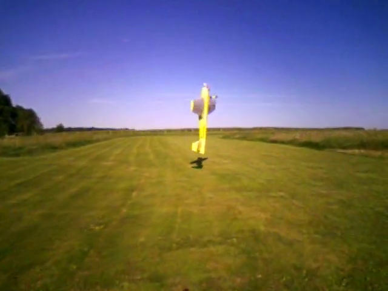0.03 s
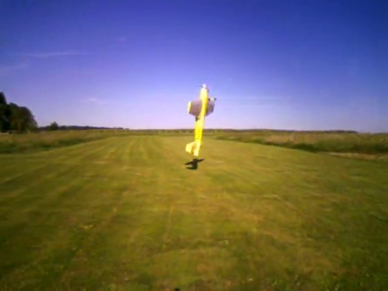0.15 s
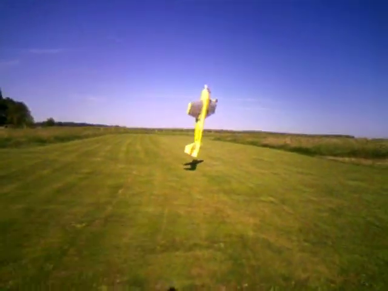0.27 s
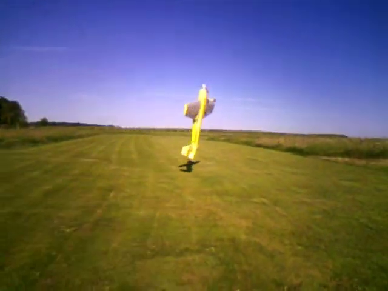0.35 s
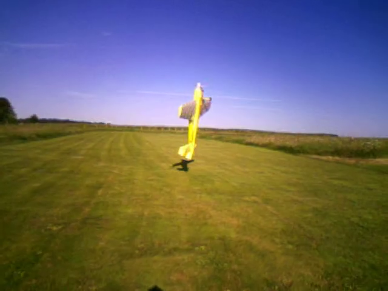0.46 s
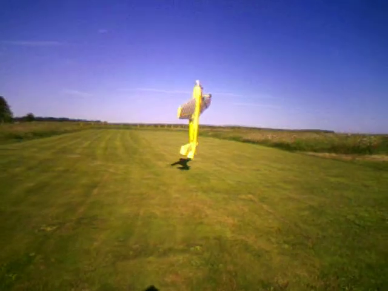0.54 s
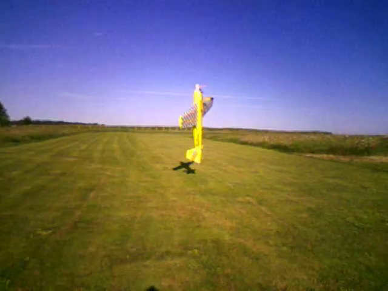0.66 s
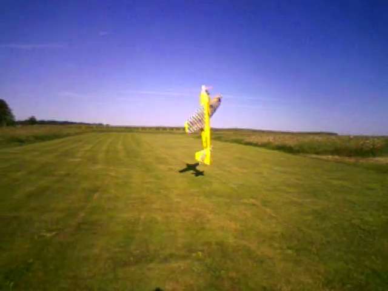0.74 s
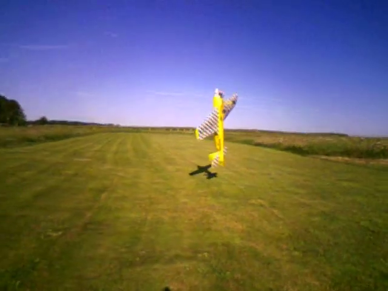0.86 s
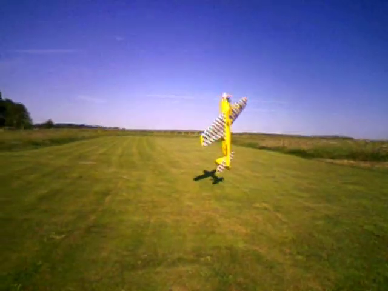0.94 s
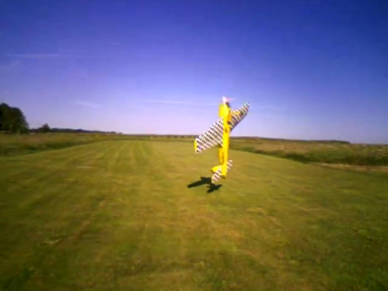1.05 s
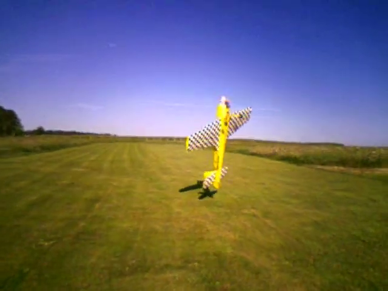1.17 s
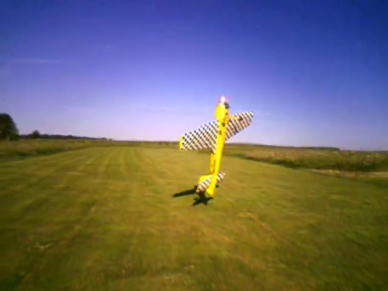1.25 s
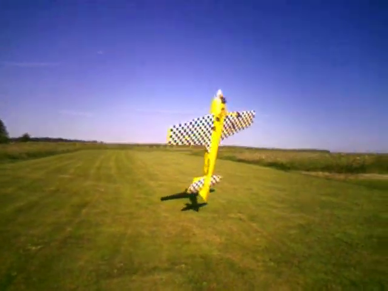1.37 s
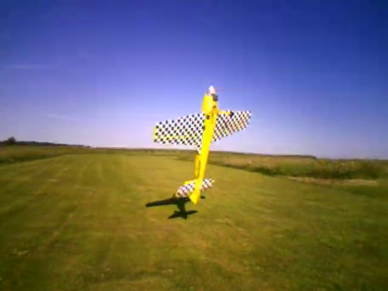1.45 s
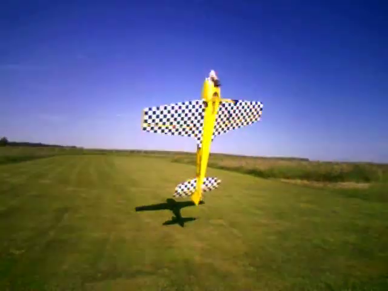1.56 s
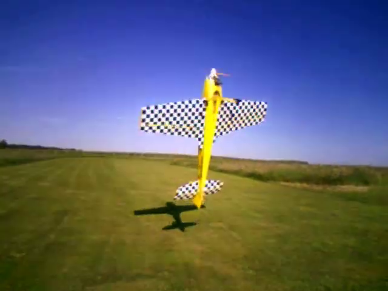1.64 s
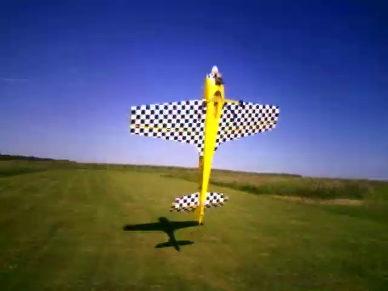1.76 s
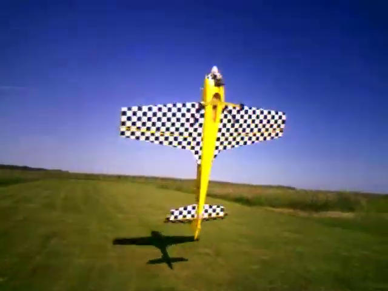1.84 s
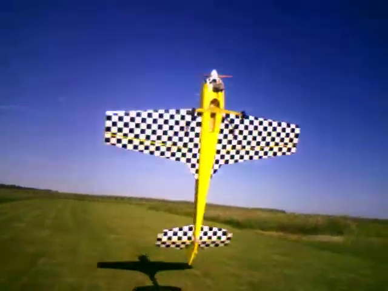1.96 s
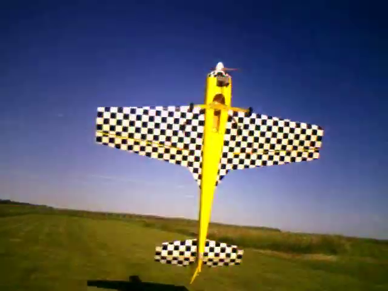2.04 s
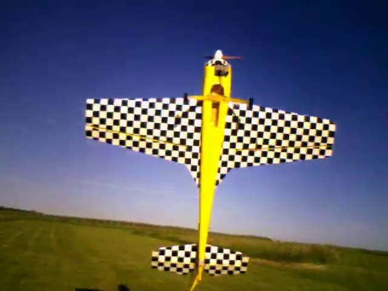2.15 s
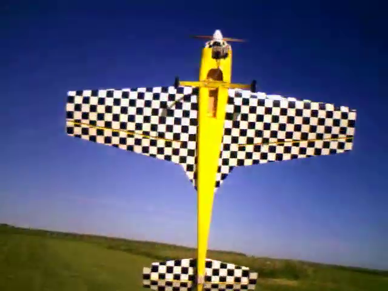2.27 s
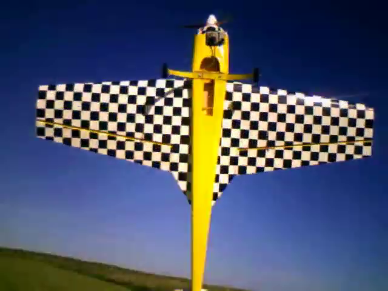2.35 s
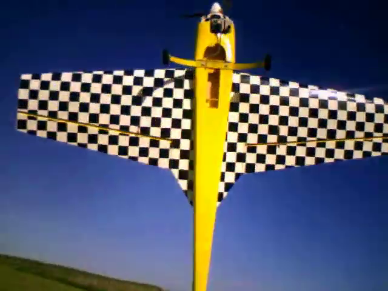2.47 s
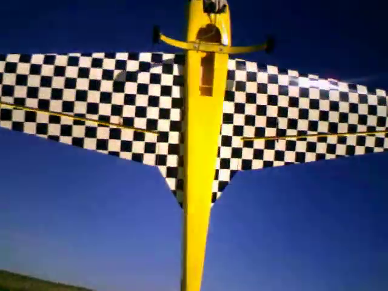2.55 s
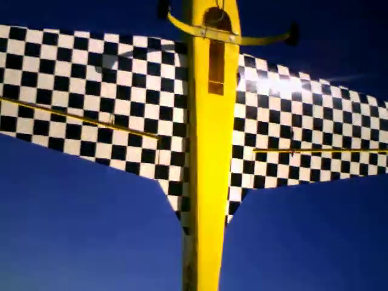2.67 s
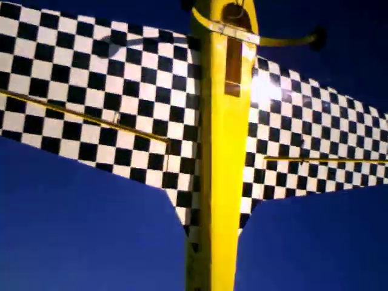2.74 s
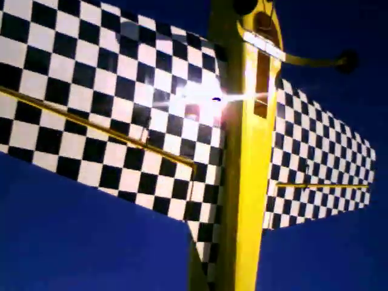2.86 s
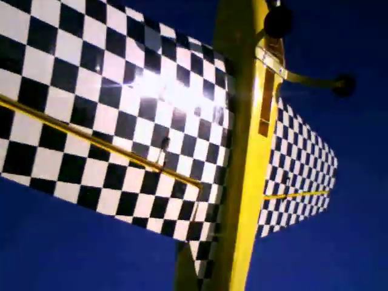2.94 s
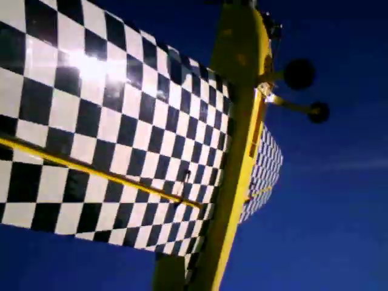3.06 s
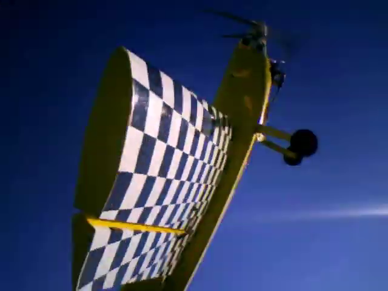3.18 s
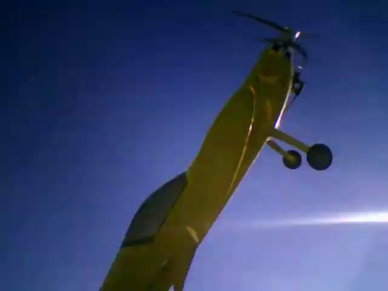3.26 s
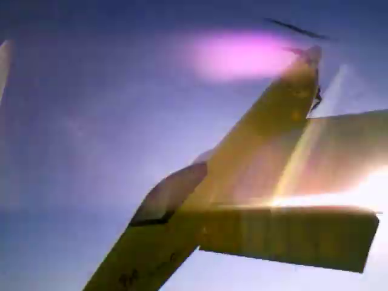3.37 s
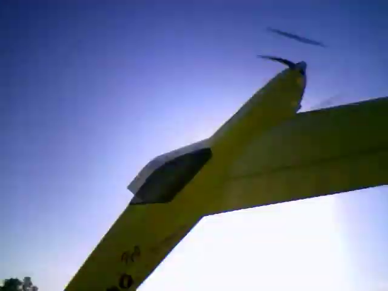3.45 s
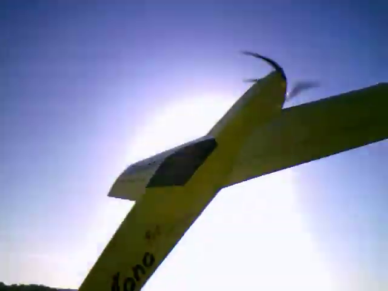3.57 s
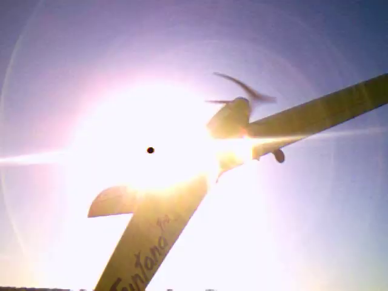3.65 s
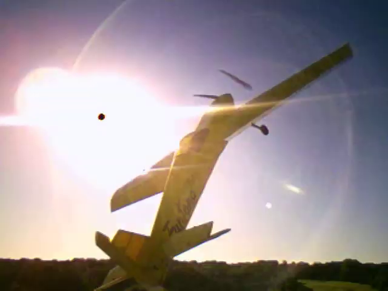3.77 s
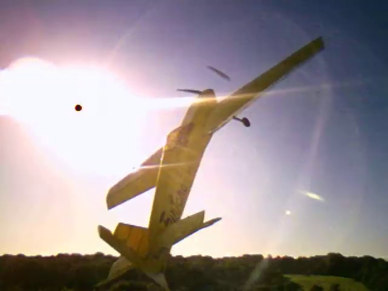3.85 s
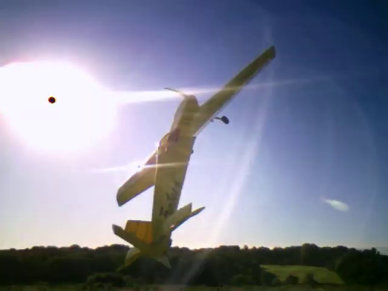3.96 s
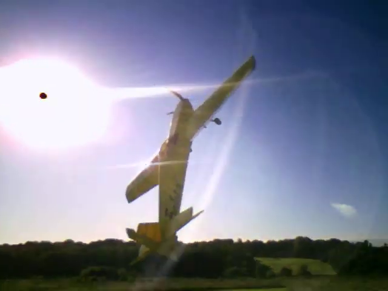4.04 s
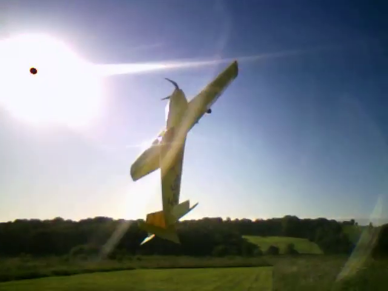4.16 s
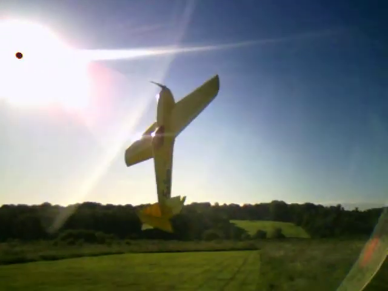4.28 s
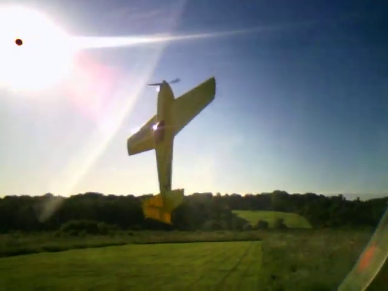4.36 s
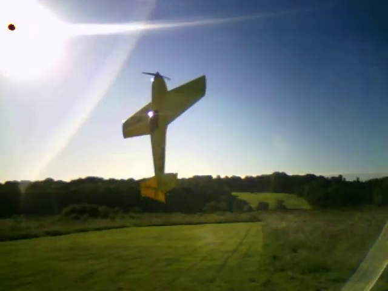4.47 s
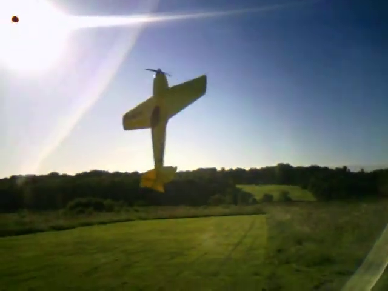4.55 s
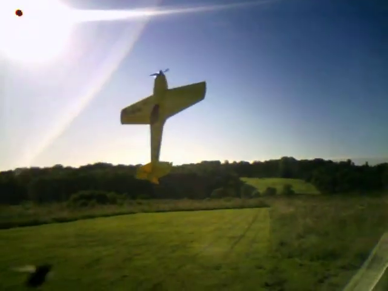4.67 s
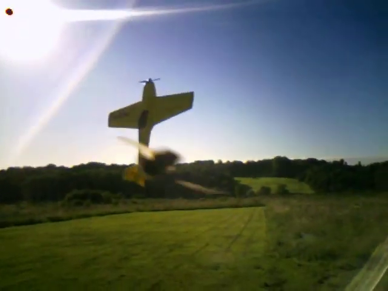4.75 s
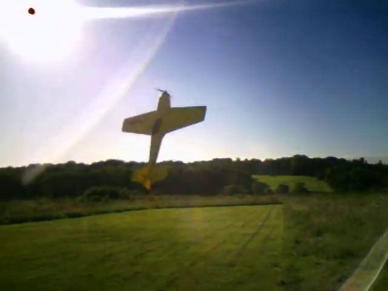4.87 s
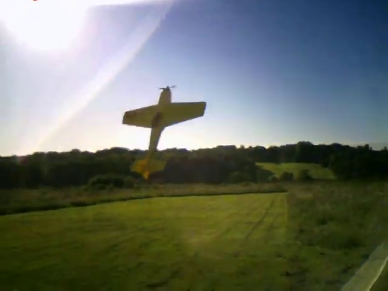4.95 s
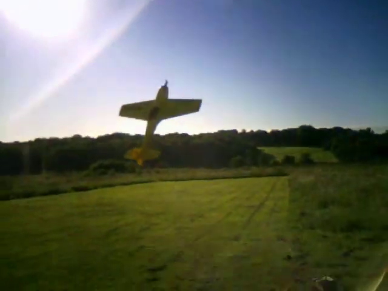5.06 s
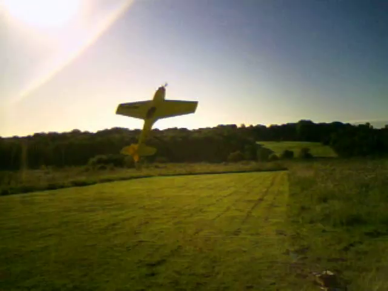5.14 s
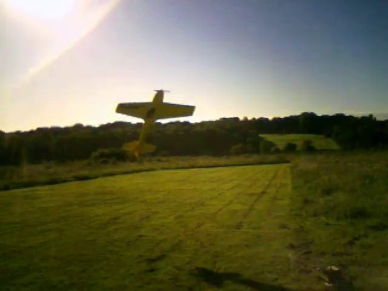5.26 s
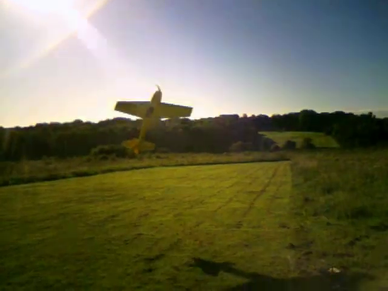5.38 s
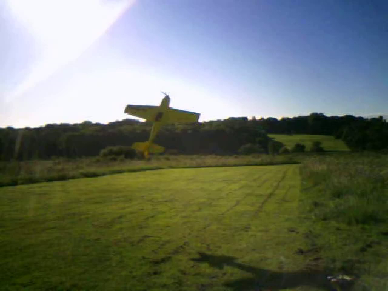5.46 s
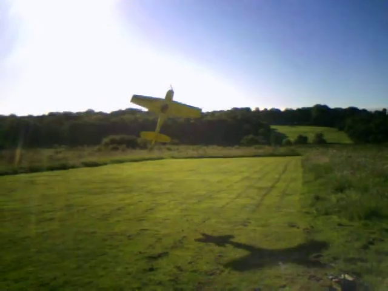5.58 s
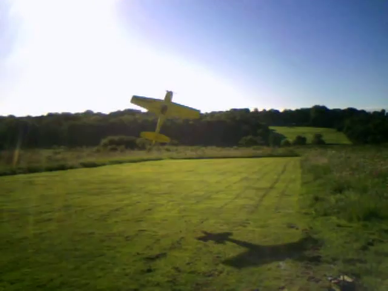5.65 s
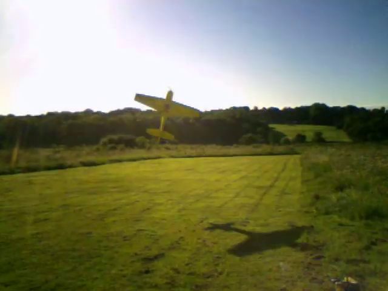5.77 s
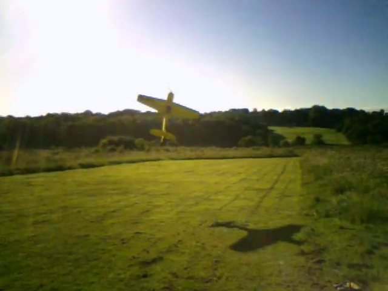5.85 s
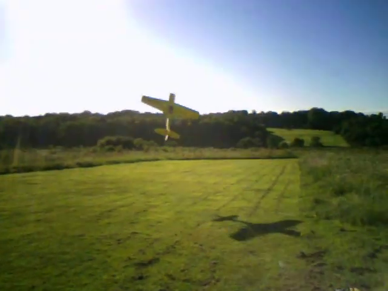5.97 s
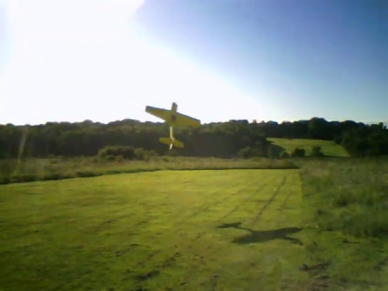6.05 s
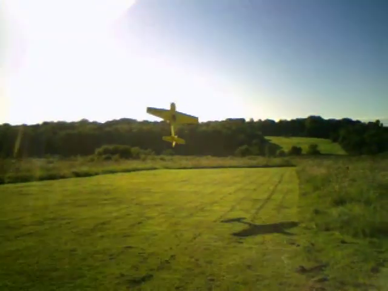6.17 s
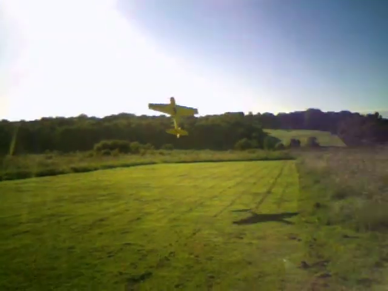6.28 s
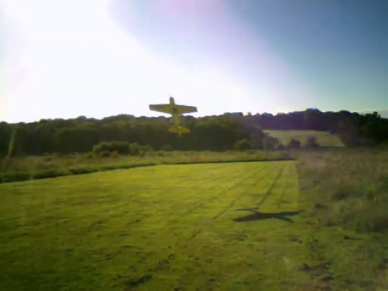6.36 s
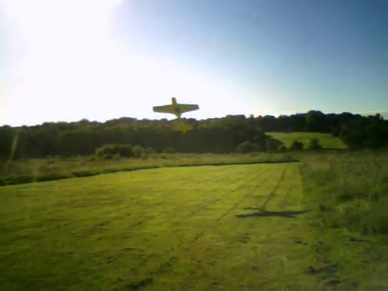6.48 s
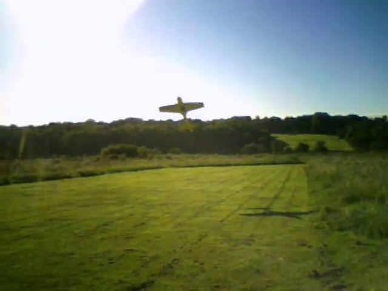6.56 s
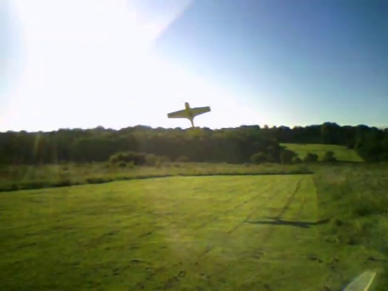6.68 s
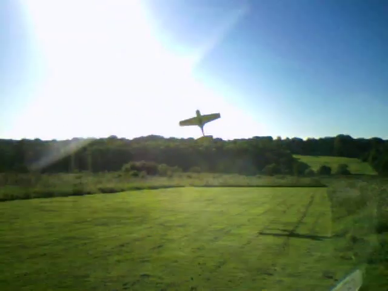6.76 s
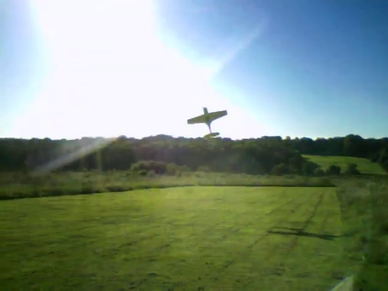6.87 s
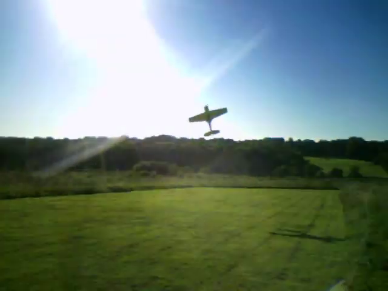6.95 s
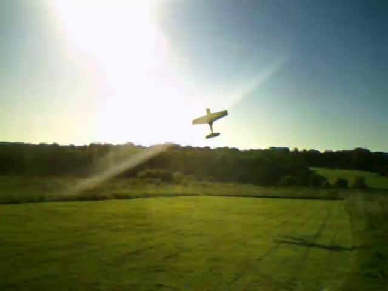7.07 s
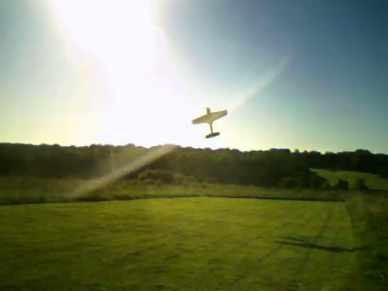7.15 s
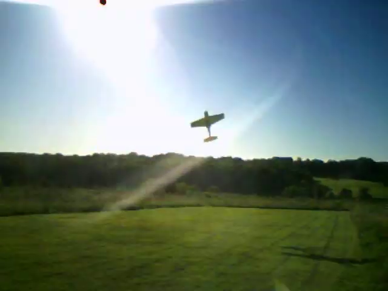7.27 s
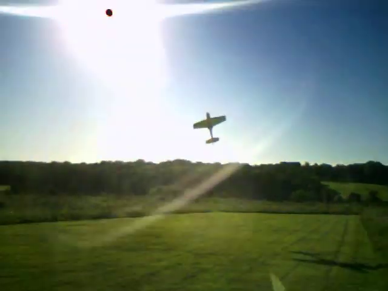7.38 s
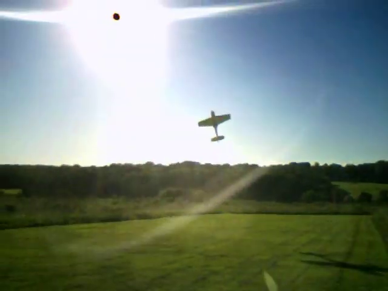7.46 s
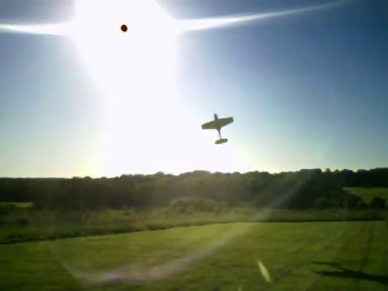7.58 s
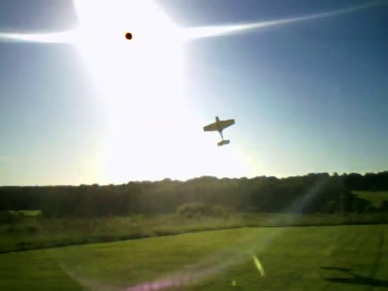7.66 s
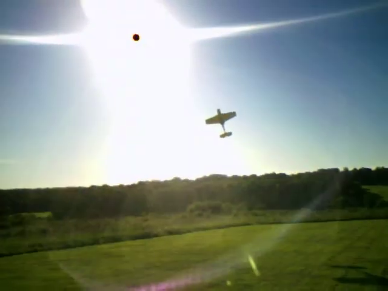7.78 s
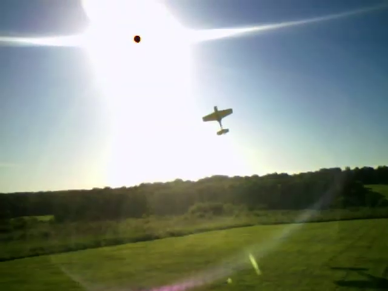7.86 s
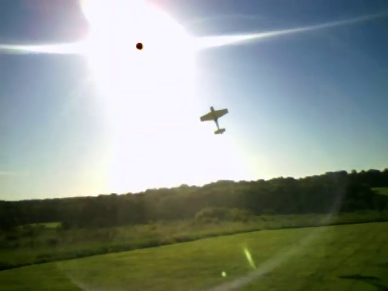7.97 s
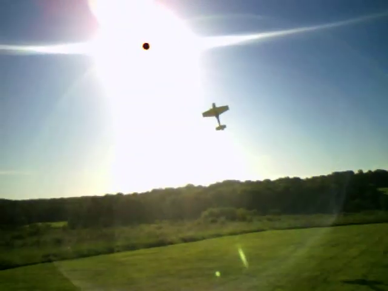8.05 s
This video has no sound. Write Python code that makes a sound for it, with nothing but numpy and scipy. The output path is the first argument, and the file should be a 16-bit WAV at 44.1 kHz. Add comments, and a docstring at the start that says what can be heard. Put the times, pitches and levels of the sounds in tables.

```python
"""A model plane hanging on its two-blade propeller opens with a buzz that surges about once a second with the throttle.
The buzz is a stack of sine orders locked to the shaft, with rushing air and a bright tick in every turn.
It swells as the plane drifts past, strongest near 2.7 s, then fades; the grass adds a short dull echo throughout.
A faint breeze lies underneath, and from about 7.6 s puffs of wind, shaped low noise, buffet the microphone.
The small camera overloads lopsidedly, samples at 8 kHz with an offset and clips again on playback."""
import sys
import numpy as np
from scipy import signal
from scipy.fft import rfft, irfft, next_fast_len
from scipy.io import wavfile
from scipy.ndimage import uniform_filter1d

SR = 44100
rng = np.random.default_rng(int(sys.argv[2]) if len(sys.argv) > 2 else 0)


def bounce(signal):
    """Save signal as a 16-bit WAV file at the path given by the first command-line argument."""
    frames = np.transpose(np.atleast_2d(signal))
    limited = np.clip(frames, -1, 1)
    pcm = np.round(limited * 32767).astype(np.int16)
    wavfile.write(sys.argv[1], SR, pcm)


N = 358091

HOVER_HZ = 95  # shaft speed at a steady hover
# high orders come first in each turn: lead in turns per octave of order
SWEEP_TURNS = 0.085

# shaft speed under the pumped throttle: (t/s, f/Hz)
SHAFT_SPEED = [(0, 94.9), (.25, 96.83), (.4, 96.6), (.59, 91.5), (.88, 104), (1.15, 113.8), (1.29, 109.3),
               (1.5, 91.16), (1.71, 80.1), (1.88, 88.2), (2.04, 93.4), (2.4, 84.66), (2.64, 87.13),
               (2.92, 95.4), (3.12, 97.63), (3.45, 109.7), (3.62, 104.9), (3.77, 91.8), (3.98, 88.34),
               (4.16, 89.56), (4.3, 92.6), (4.48, 80), (4.7, 67.13), (4.93, 79.87), (5.13, 94.94),
               (5.4, 105.7), (5.65, 93.14), (5.85, 87.46), (6.13, 94.7), (6.25, 96.5), (6.53, 97.9),
               (6.79, 96.75), (7.19, 101.9), (7.6, 102), (8.12, 96.7)]
# the plane coming close and leaving: (t/s, buzz level/dB at steady hover speed, rush level/dB over buzz)
PASS_BY = [(0, -14.5, -1.5), (.25, -11, -3.5), (.5, -10, -3), (.85, -10.5, -4), (1.15, -4, -9),
           (1.45, -4, 1), (1.8, -3.5, -2), (2.05, 1.5, -4), (2.35, 2, -5.5), (2.65, 13, -8), (3.1, 5, -3.5),
           (3.6, 7, -9.5), (3.75, 0.5, -4.5), (4.3, -5.5, -5), (4.45, -1.5, -5), (4.7, -7, -2),
           (5.0, -9.5, -7.5), (5.35, -13.5, -5.5), (5.6, -12, -2.5), (6.13, -13.5, -6.5), (6.25, -17, -3.5),
           (6.6, -18, -5.5), (7.1, -21, -5), (7.6, -20, -7), (8.12, -21.5, -5)]
# how loud the tick of each turn is: (t/s, level/dB over a tick 20 dB below the rush)
RASP_LIFT = [(0, 8), (.7, 3), (1.1, 5), (1.5, 5), (2.2, 1), (4.3, 0), (5.2, -4), (8.12, -1.5)]


def plane():
    """Buzz, low orders, rush and rasp, all locked to one shaft whose speed also sets loudness and brightness."""
    shaft_hz = glide(SHAFT_SPEED)
    push = np.gradient(shaft_hz) * SR  # Hz per second
    near_db, rush_db = curve(PASS_BY)
    rasp_db = curve(RASP_LIFT)[0]

    # louder when fast (dB per octave), and while the motor speeds up (dB per Hz/s)
    buzz_db = near_db + 7 * np.log2(shaft_hz / HOVER_HZ) + 0.0677 * push
    # tilt of the orders in dB per octave; a slow shaft loses the low ones first
    bright = -0.13 - 0.028 * (shaft_hz - HOVER_HZ)
    # the loaded propeller never turns quite evenly
    turns = np.cumsum(shaft_hz * (1 + 0.003066 * walk(30))) / SR
    # 1 at hover, more off throttle
    slack = (HOVER_HZ / shaft_hz) ** 6.5
    # a speed change of 60 Hz/s adds as much phase wavering as the hover has
    unsteady = slack + np.abs(push) / 60

    air = undb(rush_db) * (rush(turns, slack) + undb(rasp_db) * rasp(turns))
    buzz_and_air = over_grass(orders(turns, bright, unsteady) + air)
    return undb(buzz_db) * buzz_and_air + low_orders(turns)


# upper orders of the buzz, before tilt and swells: (f/multiple of shaft speed, relative level/dB)
BUZZ_ORDERS = [(4, -4.5), (5, -3), (6, -2.5), (7, -2.5), (8, -3.5), (10, -5.5), (14, -9.5), (20, -12),
               (40, -41.5)]


def orders(turns, bright, unsteady):
    """Upper orders of the turn; each wavers in level, and in phase more so when high or unsteady, so the lines break up."""
    multiple, db = np.transpose(BUZZ_ORDERS)
    buzz = 0
    for k in range(4, 41):
        steady_db = np.interp(k, multiple, db) + swell(k) + bright * np.log2(k / 7)
        order_db = steady_db + 2.1 * walk(5) + 1.94 * walk(25)
        waver = (0.02 + 0.004 * k) * unsteady * walk(30)  # cycles
        scatter = 0.2 * rng.standard_normal()  # random phase of each order, in cycles
        cycles = k * (turns + SWEEP_TURNS * np.log2(k / 40)) + scatter + waver
        buzz = buzz + undb(order_db) * np.sin(2 * np.pi * cycles)
    return level(buzz, 0)


# single orders that sing out or drop away: (from t/s, to t/s, f/multiple of shaft speed, lift level/dB)
ORDER_SWELLS = [(0, .84, 5, 7.5), (0, .47, 15, 9), (0, .7, 8, 7), (0.719, 1.42, 8, 10), (.8, 1.14, 6, -7),
                (1.503, 1.85, 9, 6), (.15, .48, 9, -11.5), (.9, 1.3, 5, 7.5), (1.02, 1.29, 10, 8),
                (1.275, 1.54, 13, 9.5), (1.44, 1.7, 10, 9.5), (1.82, 2.7, 6, 6.5), (1.83, 2.24, 4, 5),
                (1.92, 2.17, 8, 6.5), (2.34, 2.61, 4, -16.5), (2.56, 3.12, 8, 5.5), (2.76, 3.1, 13, 12),
                (2.97, 3.27, 10, -13.5), (3.0, 3.45, 5, 5), (3.34, 3.73, 6, 5.5), (3.51, 4.08, 5, 7.5),
                (3.63, 4.57, 4, -7), (3.755, 4.01, 7, 7), (3.89, 4.4, 6, 8.5), (4.05, 4.26, 10, 8.5),
                (4.3, 4.55, 5, 5.5), (4.33, 4.51, 7, 9.5), (5.16, 5.58, 11, 5), (2.3, 2.751, 5, 3),
                (4.688, 5.131, 7, 5), (5.58, 7.02, 4, 5.5), (5.62, 6.03, 5, 6), (5.77, 6.24, 11, 8.5),
                (5.86, 6.15, 10, 5), (6.39, 6.66, 9, -12.5), (6.41, 6.72, 10, 9.5), (6.6, 7.47, 6, -7),
                (7.29, 8.1, 4, 7.5), (7.31, 7.53, 9, 10.5), (6.718, 7.203, 14, 5), (7.0, 7.3, 13, 4.5),
                (7.02, 7.296, 9, 4), (7.19, 7.528, 12, 3.5), (7.614, 7.97, 7, 5), (2.23, 2.554, 12, 4.5),
                (.85, 1.303, 7, 4), (5.045, 5.438, 10, 4.5), (5.08, 5.463, 6, 4), (7.52, 7.95, 14, 10),
                (7.62, 8.1, 9, -10.5)]


def swell(order):
    """Lift in dB of one order over time, with soft edges."""
    lift = np.zeros(N)
    for start, end, multiple, db in ORDER_SWELLS:
        if round(multiple) == order:
            lift[int(start * SR):int(end * SR)] = db
    return uniform_filter1d(lift, int(0.08 * SR))


# body of the propeller tone: (t/s, rms level/dB of the first, second, third order of the shaft)
LOW_LEVELS = [(0, -47, -27.5, -21), (.4, -50, -37, -19.5), (.62, -44, -25.5, -25), (.75, -26, -34, -17.5),
              (1.05, -21, -15, -6.5), (1.3, -17, -17.5, -8.5), (1.45, -45, -19, -12.5),
              (1.65, -23, -35, -15.5), (1.76, -19.5, -25, -3), (1.88, -22, -12, -12),
              (2.02, -23, -3.5, -13.5), (2.3, -34, -13, -10.5), (2.64, -15, 2, -7), (3.12, -10.5, -0.5, 2),
              (3.48, -7, 2, -15), (3.75, -24.5, -16, -16.5), (4.1, -38, -13, -13), (4.36, -27, -18, -21),
              (4.6, -41, -27, -11.5), (4.85, -36, -29, -8.5), (5.02, -31, -33, -15),
              (5.38, -36, -12.5, -17.5), (5.7, -36.5, -38, -29.5), (6.05, -36, -47, -31),
              (6.55, -35.5, -36.5, -28.5), (7.2, -40.5, -29, -22.5), (7.6, -46.5, -26.5, -28.5),
              (8.12, -35, -38, -27)]


def low_orders(turns):
    """The three lowest shaft orders as sines, each with its own level over time."""
    low = 0
    for k, db in enumerate(curve(LOW_LEVELS), 1):
        cycles = k * (turns + SWEEP_TURNS * np.log2(k / 40))
        low = low + undb(db) * np.sin(2 * np.pi * cycles)
    return np.sqrt(2) * low


# colour of the air coming off the blades: (f/Hz, relative level/dB per Hz)
RUSH_COLOUR = [(60, -32.5), (150, -17.5), (400, -5), (800, -1.5), (1500, -2.5), (2500, -20), (4500, -21)]


def rush(turns, slack):
    """Turbulent air off the blades, a puff each turn; slower tips hiss duller."""
    air = noise(RUSH_COLOUR)
    roar = signal.lfilter(*signal.butter(2, 1200, fs=SR), air)
    hiss = (air - roar) / slack ** 0.42
    throb = 1 + 0.42 * np.cos(2 * np.pi * turns) + 0.26 * np.cos(4 * np.pi * turns)
    puff = np.exp(0.47 * np.cos(2 * np.pi * turns)) * undb(0.93 * walk(60))
    return level(undb(1.3 * walk(14)) * (throb * roar + puff * hiss), 0)


def rasp(turns):
    """A short bright tick of air at the same point of every turn."""
    tick = np.exp(-(turns % 1) / 0.15) * undb(2.0 * walk(70))
    bright_air = noise([(1500, -27.5), (2800, -11.0), (4000, 7), (5000, -13.5), (8000, -27)])
    return level(tick * bright_air, -20.0)


# echo off the grass: (t/s, lag/ms, strength/0-1 before the dulling filter)
GRASS_ECHO = [(0, 1.9, 0.12), (1.2, 2.4, 0.1), (2.2, 2.856, 0.15), (4.4, 2.796, 0.3), (5.2, 2.02, 0.04),
              (5.7, 2.195, 0.2), (7.0, 2.215, 0.46), (8.12, 3.04, .62)]


def over_grass(x):
    """Direct sound plus a later, duller copy off the ground."""
    lag_ms, strength = curve(GRASS_ECHO)
    dull = signal.lfilter(*signal.butter(1, 2200, fs=SR), x)
    echo = np.interp(np.arange(N) - lag_ms * SR / 1000, np.arange(N), dull)
    return (x + np.clip(strength, 0, 1) * echo) / np.sqrt(1 + strength ** 2)


# puffs of wind on the microphone: (peak t/s, level/dB before the buffeting noise adds 4.2 dB)
WIND_PUFFS = [(7.6, -33), (7.67, -31), (7.74, -27.5), (7.79, -23.5), (7.86, -33), (7.96, -27), (8.08, -23)]


def wind():
    """A faint breeze, then separate puffs that buffet the microphone in lumps."""
    t = np.arange(N) / SR
    rise_s, fall_s = 0.029, 0.063
    gust = 0
    for peak_s, db in WIND_PUFFS:
        since = t - peak_s
        decay = np.where(since < 0, (since / rise_s) ** 2, since / fall_s)
        gust = gust + undb(db) * np.exp(-decay)

    rumble = noise([(15, -2.0), (60, 4.0), (150, 4), (350, -1.5), (600, -5.5), (2000, -43.0)])
    buffet = level(undb(1.2 * walk(50)) * rumble, 4.2)
    breeze = undb(-46) * noise([(15, 5.5), (100, -7), (1000, -23.5)])
    return gust * buffet + breeze


def undb(db):
    """Decibels to amplitude."""
    return 10 ** (np.asarray(db) / 20)


def level(x, db):
    """Scale to an rms level in dB."""
    return x * undb(db) / np.sqrt(np.mean(x ** 2))


def curve(table):
    """Columns of a table joined by straight lines in time."""
    s, *columns = np.transpose(table)
    return [np.interp(np.arange(N) / SR, s, c) for c in columns]


def glide(table):
    """A value passing through (t/s, value) points without corners."""
    s, v = np.transpose(table)
    slope = np.gradient(v, s)
    t = np.arange(N) / SR
    i = np.clip(np.searchsorted(s, t) - 1, 0, len(s) - 2)
    h = s[i + 1] - s[i]
    u = (t - s[i]) / h
    ease = u * u * (3 - 2 * u)
    bend = h * u * (1 - u) * (slope[i] * (1 - u) - slope[i + 1] * u)
    return v[i] + (v[i + 1] - v[i]) * ease + bend


def walk(rate):
    """Random levels joined smoothly, rate a second; spread near 1."""
    k = int(SR / rate)
    knots = rng.standard_normal(N // k + 2)
    line = np.interp(np.arange(N) / k, np.arange(len(knots)), knots)
    return 1.166 * uniform_filter1d(line, k // 2)


def noise(points):
    """Noise coloured by (f/Hz, level/dB) points; rms 1."""
    hz, db = np.transpose(points)
    n = next_fast_len(N)
    f = np.maximum(np.fft.rfftfreq(n, 1 / SR), 1)
    colour = undb(np.interp(np.log(f), np.log(hz), db))
    return level(irfft(rfft(rng.standard_normal(n)) * colour, n)[:N], 0)


def scene():
    """The plane over the field, with wind on the microphone."""
    return (plane() + wind())[None]


def record(dry):
    """Lopsided overload, coupling capacitor, 8 kHz sampling with an offset; full scale clips samples and playback alike."""
    camera_hz, top_hz = 8000, 15790
    offset, ceiling = -0.11, 0.71
    rail_high, rail_low, knee = 0.27, 0.98, 4

    # loud sound drags the working point of the preamp down
    dry = dry - 0.087 * uniform_filter1d(dry ** 2, int(0.1 * SR))
    rail = np.where(dry > 0, rail_high, rail_low)
    hot = dry / (1 + np.abs(dry / rail) ** knee) ** (1 / knee)
    # the capacitor recentres the lopsided wave, so the upper rail climbs as the overload grows
    hot = hot - uniform_filter1d(hot, int(0.12 * SR)) + offset

    # nothing smooths the clipped edges before sampling, so they fold back and ring in step with the clock
    sampled = np.interp(np.arange(0, N + 20, SR / camera_hz), np.arange(N), hot[0])
    sampled = np.clip(sampled, -ceiling, ceiling)
    up, down = SR // 100, camera_hz // 100
    smooth = signal.firwin(32 * up + 1, 1 / up, window=("kaiser", 9))
    played = signal.resample_poly(sampled, up, down, window=smooth, padtype="mean")[:N]
    played = np.clip(played, -ceiling, ceiling)

    # filter around the first sample so the offset causes no starting thump
    top = signal.ellip(14, 0.2, 60, top_hz, fs=SR, output="sos")
    return (signal.sosfilt(top, played - played[0]) + played[0])[None]


dry = scene()
out = record(dry)
bounce(out)
```